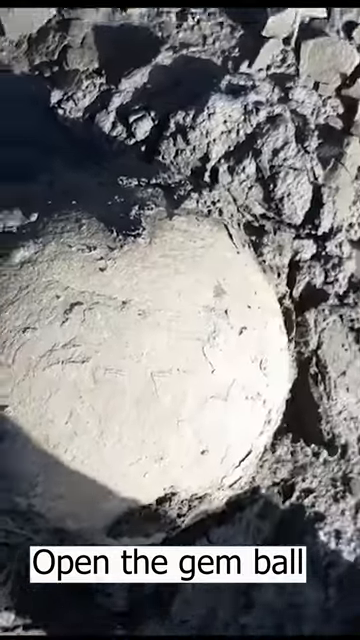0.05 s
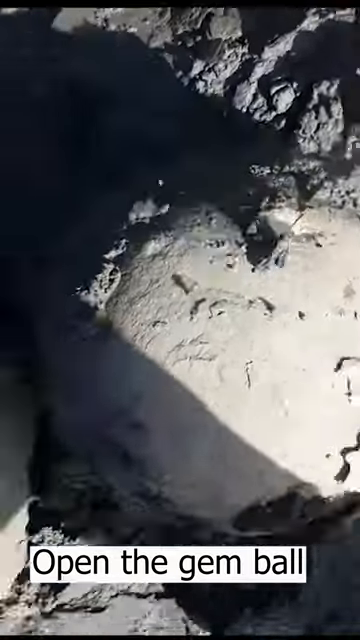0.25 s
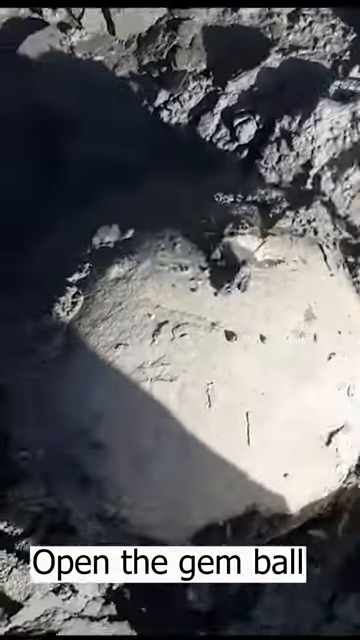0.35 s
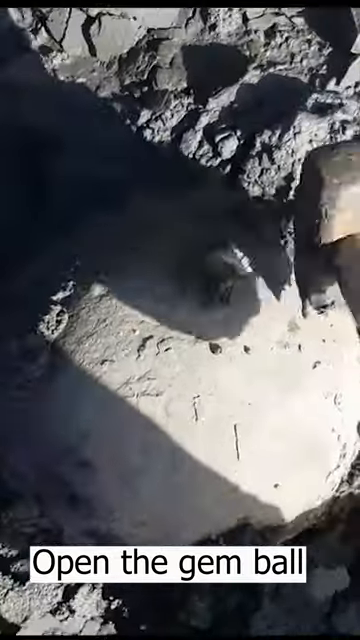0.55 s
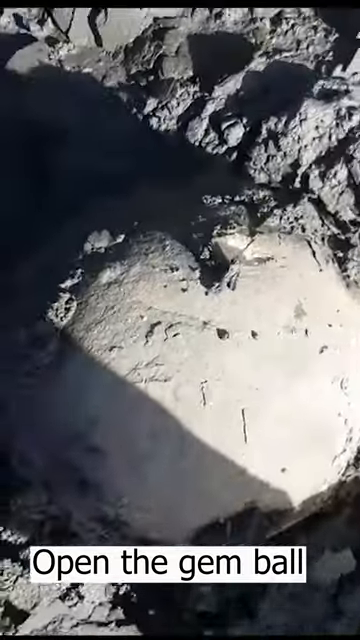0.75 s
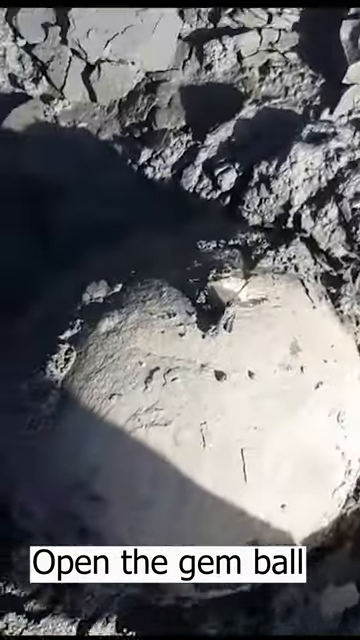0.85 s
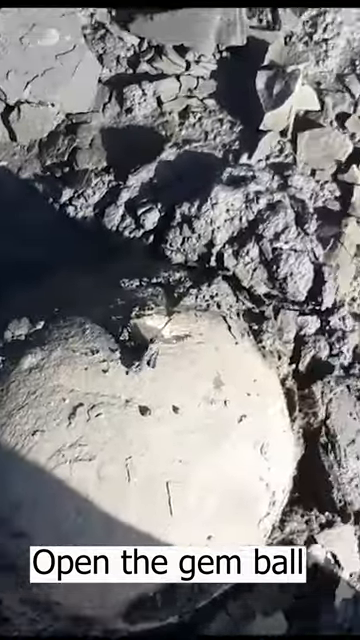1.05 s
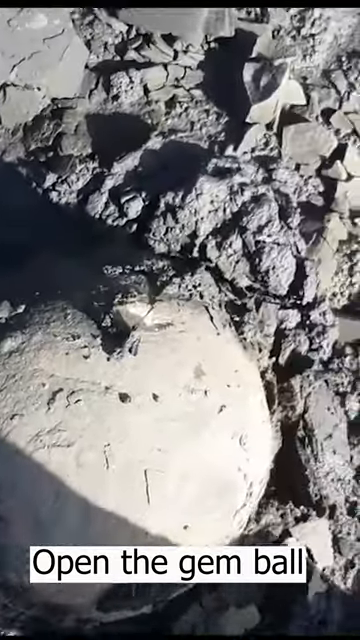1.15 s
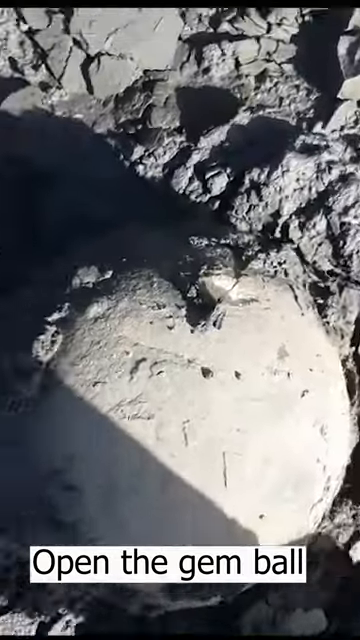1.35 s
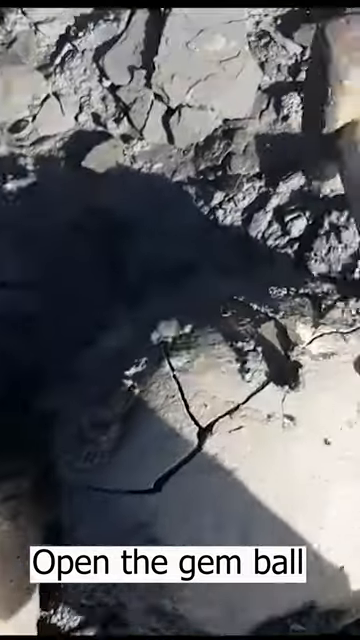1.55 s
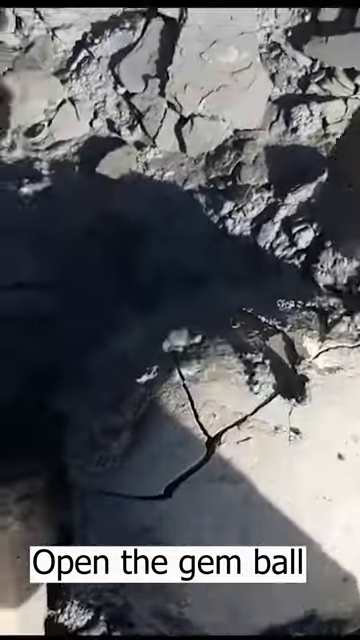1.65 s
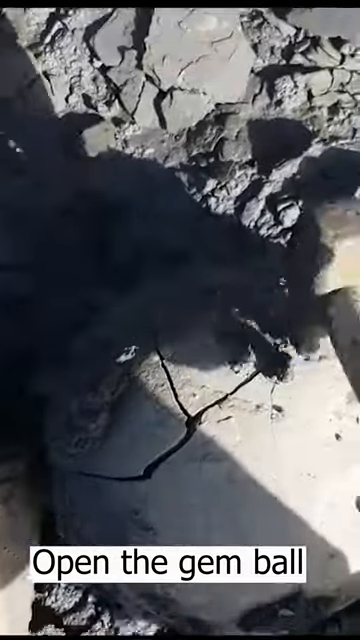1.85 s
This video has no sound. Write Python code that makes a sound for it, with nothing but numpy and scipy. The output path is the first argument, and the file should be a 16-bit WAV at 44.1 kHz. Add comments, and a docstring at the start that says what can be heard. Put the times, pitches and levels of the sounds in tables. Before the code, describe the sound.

Two sharp hammer blows on a rock outdoors, then loose pieces knock down.

```python
"""Hammer splitting a stone

A hammer strikes a round stone in dry rubble twice, up close; the second blow splits it.
Each blow rings the stone briefly, thuds into the ground, sprays grit and overloads the microphone.
A soft rush of air and sleeve swells before each blow, wind rumbles at first, and loose pieces knock down.
Rings, thuds and knocks are damped sines; cracks, scuffs and air are shaped noise."""
import sys
import numpy as np
from scipy import signal
from scipy.fft import rfft, irfft
from scipy.io import wavfile
from scipy.ndimage import uniform_filter1d

SR = 44100
rng = np.random.default_rng(int(sys.argv[2]) if len(sys.argv) > 2 else 0)


def master(y):
    """Save y as 16-bit WAV."""
    cut = np.clip(np.atleast_2d(y).T, -1, 1)
    pcm = np.round(cut * 32767)  # scale
    wavfile.write(sys.argv[1], SR, pcm.astype(np.int16))


N = 83790
T = np.arange(N) / SR
AGE = np.arange(SR // 5) / SR  # seconds into one short event
LOG_HZ = np.log(np.arange(N // 2 + 1) * SR / N + 1)
CONTACT_S = 0.00042  # attack of steel on stone

# Hammer blows: t/s, level/dB, main note f/Hz, gain/dB, upper note f/Hz, gain/dB, crack gain/dB,
# thud f/Hz, level/dB, t60/s, rebound delay/s, gain/dB, scatter level/dB (gains add to the blow's level)
BLOWS = [(0.2345, 9.5, 793.7, 2.5, 1289, -3.5, -5.5, 161.2, -9.5, 0.039, 0.01, -32, -19),
         (1.4550, 8, 862, 1.5, 1434, -16.5, -8, 201.8, 1, 0.015, .0120, -19.5, -21)]


def undb(db):
    """Decibels to gain."""
    return 10 ** (np.asarray(db) / 20)


def pan(db):
    """Stereo gains for a left-minus-right level."""
    return undb(np.array([[1], [-1]]) * db / 2)


def along_hz(points):
    """Read a table of (f/Hz, value) at every frequency."""
    hz, value = np.array(points, float).T
    return np.interp(LOG_HZ, np.log(hz), value)


def colour(x, points):
    """Filter by a spectral shape; white noise keeps its power."""
    gain = undb(along_hz(points))
    return irfft(rfft(x) * gain / np.sqrt(np.mean(gain ** 2)), N)


def noise(points):
    """Diffuse coloured noise, narrow in the bass and wide in the treble."""
    # Likeness of left and right: f/Hz, correlation (negatives count as 0)
    likeness = [(60, 0.73), (220, .92), (600, 0.55), (1400, -0.27), (8000, .02)]
    # Stereo lean: f/Hz, left minus right/dB
    balance = [(60, -4), (500, 0.2), (2000, -2.5), (5000, -1.5), (11000, 4.5)]
    mid, side = rfft(rng.standard_normal((2, N)))
    alike = np.clip(along_hz(likeness), 0, 1)
    pair = mid * np.sqrt((1 + alike) / 2) + np.array([[1], [-1]]) * side * np.sqrt((1 - alike) / 2)
    return colour(irfft(pair * pan(along_hz(balance)), N), points)


def wander(rate):
    """Glide between random values, `rate` of them a second."""
    step = int(SR / rate)
    return uniform_filter1d(np.repeat(rng.standard_normal(N // step + 1), step), step)[:N]


def fader(points):
    """Gain along a table of (t/s, level/dB)."""
    return undb(np.interp(T, *np.array(points).T))


def burst(rise, t60, age=AGE):
    """Quick attack, exponential decay."""
    return (1 - np.exp(-age / rise)) * np.exp(-np.log(1000) * age / t60)


def ring(hz, rise, t60, right_lag_s=.00007):
    """One damped mode, reaching the right channel a little later."""
    age = np.maximum(AGE - np.array([[0], [right_lag_s]]), 0)
    return burst(rise, t60, age) * np.sin(2 * np.pi * hz * age)


def puff(source, rise, t60):
    """A short burst cut from a random place in a noise."""
    i = rng.integers(N - len(AGE))
    return source[:, i:i + len(AGE)] * burst(rise, t60)


def add(out, start, sound):
    """Mix a short sound in at `start` seconds."""
    i = int(start * SR)
    out[:, i:i + sound.shape[-1]] += sound[..., :N - i]


def swings(flutter_db=1.77):
    """Air rushes and the sleeve hisses as each swing speeds up."""
    # Swell of the rush: t/s, level/dB
    rush_swell = [(0, -37), (.1, -41), (.17, -35.5), (.22, -37), (.3, -43.5), (.42, -65), (.88, -62),
                  (1.0, -46.5), (1.1, -46.5), (1.2, -43), (1.32, -40.5), (1.41, -38), (1.48, -47.5),
                  (1.56, -47.5), (1.65, -64.5), (1.9, -68)]
    # Soft body of the rush: f/Hz, level/dB
    rush_eq = [(30, -12), (110, -4), (300, 0.5), (550, -1), (1000, -7), (2000, -10.5), (4000, -21.5),
               (8000, -36), (10000, -37.5), (12700, -36), (13600, -67.5)]
    # Swell of the sleeve: t/s, level/dB
    sleeve_swell = [(0, -78), (.08, -68), (.17, -53), (.23, -59), (.3, -59.5), (.4, -81), (.95, -99),
                    (1.05, -67), (1.24, -84), (1.29, -59), (1.4, -51), (1.45, -64), (1.53, -69.5),
                    (1.62, -92)]
    # Dry cloth hiss: f/Hz, level/dB
    sleeve_eq = [(1000, -9.5), (3000, 3), (5500, 7), (8200, -8), (10000, -2), (12700, -3.5), (13600, -36.5)]
    swish = noise(rush_eq) * fader(rush_swell) + noise(sleeve_eq) * fader(sleeve_swell)
    return swish * undb(flutter_db * wander(39))


def wind(gust_db=2.5):
    """Wind buffets the microphone, strongest at the start."""
    # Wind strength: t/s, level/dB
    strength = [(0, -32), (.11, -30), (.19, -34), (.27, -44.5), (.42, -54), (.95, -78.5), (1.06, -51.5),
                (1.38, -55.5), (1.6, -66)]
    # Low rumble: f/Hz, level/dB
    rumble_eq = [(20, -15.5), (60, 2), (170, 4), (280, -1), (450, -25), (1200, -48.5)]
    return noise(rumble_eq) * fader(strength) * undb(gust_db * wander(37))


def open_air(level_db=-54.5):
    """A quiet, steady outdoor bed."""
    # Dark ambience: f/Hz, level/dB
    ambience_eq = [(20, -24.5), (50, -12), (120, -2), (380, 0), (800, -6.5), (1300, -13), (2700, -17),
                   (5000, -32), (8000, -44), (11000, -38), (13000, -51), (14000, -65)]
    return undb(level_db) * noise(ambience_eq)


def scuffs(width_octaves=0.41, flutter_db=3):
    """Grit and cloth swish briefly as the striker shifts and swings."""
    # Dry scuffs: peak t/s, level/dB, half length/s, centre f/Hz
    swishes = [(0.177, -36.5, 0.0063, 1100), (0.317, -48, 0.0086, 1850), (0.35, -70.5, 0.017, 5900),
               (1.316, -51, 0.0047, 8150), (1.402, -37.5, 0.0031, 1386)]
    out = np.zeros((2, N))
    for t, db, half_length, hz in swishes:
        edges = np.minimum(hz * 2 ** (np.array([-.5, .5]) * width_octaves), SR / 2 - 1)
        band = signal.butter(2, edges, "band", fs=SR, output="sos")
        grains = signal.sosfilt(band, rng.standard_normal((2, len(AGE))))
        swell = np.exp(-((AGE - AGE.mean()) / half_length) ** 2)
        add(out, t - AGE.mean(), undb(db) * grains / np.std(grains) * swell)
    return out * undb(flutter_db * wander(400))


def stone(main_hz, main_db, upper_hz, upper_db):
    """Steel on stone rings heavily damped modes; two of them depend on where the blow lands."""
    # Modes of stone and hammer head: f/Hz, level/dB, t60/s, left minus right/dB
    modes = [(524, -11, 0.016, -5.5), (965, -14, 0.024, 2.5), (1154, -15.5, 0.016, 3.5),
             (1388, -10, .014, 5), (1599.5, 0.5, 0.014, -3.5), (1861, -5, 0.01, -6.5),
             (2480, -10, 0.014, 5.5), (3170, -14, 0.011, -1.5), (4480, -19, 0.004, 7.5),
             (5023, -19.5, 0.0046, 5), (6120, -18, 0.0076, 0), (6750, -22, 0.027, 1)]
    notes = [(main_hz, main_db, 0.012, -5.5), (upper_hz, upper_db, 0.014, 3)]
    return sum(undb(db) * pan(side) * ring(hz, CONTACT_S, t60) for hz, db, t60, side in notes + modes)


def hammer(crack_t60=0.012, bite_lead_s=0.004, bite_db=-22.5, thud_lag_s=.0015, scatter_rise_s=0.0026):
    """Each blow bites, cracks and rings the stone, thuds, rebounds once and scatters off the rubble."""
    # Hard crack of contact: f/Hz, level/dB
    crack_eq = [(100, -6.5), (700, -1), (1800, 12.5), (3500, -8), (7000, -21.5), (12000, -11), (16000, -37)]
    # Sound scattered by the rubble: f/Hz, level/dB
    scatter_eq = [(40, -11), (120, -0.5), (300, -4.5), (550, -0.5), (950, -2), (1600, -10.5), (2500, -12),
                  (4000, -28), (8000, -35.5), (11500, -28.5), (14000, -56.5)]
    # Faint after-ring of the hammer head: f/Hz, level/dB, t60/s
    head_modes = [(947, -26.5, 0.12), (1267, -25.5, .09), (1410, -25.5, 0.13), (1668, -21, .07),
                  (1803, -31, 0.11), (2300, -36, .1), (2520, -40.5, .12), (4050, -42, .13)]
    out, crack, scatter = np.zeros((2, N)), noise(crack_eq), noise(scatter_eq)
    head = sum(undb(db) * ring(hz, CONTACT_S, t60) for hz, db, t60 in head_modes)
    for (t, db, main_hz, main_db, upper_hz, upper_db, crack_db,
         thud_hz, thud_db, thud_t60, rebound_s, rebound_db, scatter_db) in BLOWS:
        blow = stone(main_hz, main_db, upper_hz, upper_db)
        blow += undb(crack_db) * puff(crack, CONTACT_S, crack_t60)
        # The edge crushes the crust just before the full blow.
        add(out, t - bite_lead_s, undb(bite_db) * puff(crack, CONTACT_S, crack_t60))
        add(out, t, undb(db) * blow + head)
        add(out, t + rebound_s, undb(db + rebound_db) * blow)
        thud = pan(db=-5) * ring(thud_hz, rise=0.00097, t60=thud_t60)
        add(out, t + thud_lag_s, undb(thud_db) * thud)
        near_tail = puff(scatter, scatter_rise_s, t60=0.097)
        far_tail = undb(-25.5) * puff(scatter, scatter_rise_s, t60=.4)
        add(out, t, undb(scatter_db) * (near_tail + far_tail))
    return out


def grit(chips_per_s=350, fade_s=.07, level_db=-46.5, size_spread_db=7):
    """Tiny chips patter down after each blow, fading quickly."""
    # Bright patter: f/Hz, level/dB
    chip_eq = [(300, -16), (1900, 11.5), (4000, -9.5), (8000, -19), (11500, -16.5), (12800, -14),
               (13600, -48.5)]
    spray = sum((T > t) * np.exp(-np.abs(T - t) / fade_s) for t, *_ in BLOWS)
    landings = rng.random((2, N)) < chips_per_s / SR
    clicks = landings * undb(size_spread_db * rng.standard_normal((2, N)))
    return undb(level_db) * colour(clicks / np.std(clicks) * spray, chip_eq)


def loose_pieces(rise_s=.0008, low_cut_hz=130):
    """Loose pieces land with a tick, a crunch of dry soil, a clack and a hollow note."""
    # Landings: t/s, level/dB, note f/Hz, t60/s, clack f/Hz, clack gain/dB, tick gain/dB, crunch gain/dB
    knocks = [(0.6389, -37, 441.4, 0.041, 834, 3.5, -21, -6.5),
              (0.688, -47, 206.2, .04, 417, -12, -28, -18.5),
              (1.467, -18.5, 307, 0.057, 953, -5.5, -14.5, -7),
              (1.8780, -22.5, 309.6, 0.046, 418, -5.5, -1, -17.5)]
    # Sharp contact tick: f/Hz, level/dB
    tick_eq = [(200, -12), (900, -9.5), (2000, 4), (2600, -2.5), (3600, -3.5), (7000, -14.5), (12000, -22),
               (14000, -31.5)]
    # Dry soil crunch: f/Hz, level/dB
    crunch_eq = [(150, -10.5), (400, -3.5), (800, 5.5), (1700, -7), (3000, -18.5), (8000, -38.5),
                 (13000, -41)]
    out, contact, soil = np.zeros((2, N)), noise(tick_eq), noise(crunch_eq)
    for t, db, hz, t60, clack_hz, clack_db, tick_db, crunch_db in knocks:
        note = ring(hz, rise_s, t60)
        clack = undb(clack_db) * ring(clack_hz, rise_s, t60=0.024)
        tick = undb(tick_db) * puff(contact, rise_s, t60=0.01)
        crunch = undb(crunch_db) * puff(soil, rise_s, t60=0.055)
        add(out, t, undb(db) * (note + clack + tick + crunch))
    # Small pieces radiate little bass.
    return signal.sosfilt(signal.butter(2, low_cut_hz, "high", fs=SR, output="sos"), out)


def scene():
    """Blows and debris over the striker's movement and the air."""
    return hammer() + grit() + loose_pieces() + scuffs() + swings() + wind() + open_air()


def record(dry, knee=6.0, low_cut_hz=30, top_hz=13050):
    """The microphone flattens the peaks of the blows; the deepest bass and the top are cut."""
    clipped = dry / (1 + np.abs(dry) ** knee) ** (1 / knee)
    low_cut = signal.butter(1, low_cut_hz, "high", fs=SR, output="sos")
    high_cut = signal.ellip(8, .2, 60, top_hz, fs=SR, output="sos")
    return signal.sosfilt(high_cut, signal.sosfilt(low_cut, clipped))


dry = scene()
out = record(dry)
master(out)
```